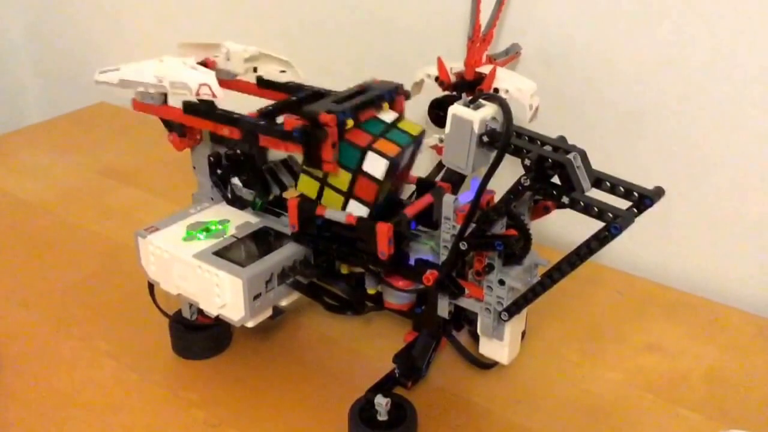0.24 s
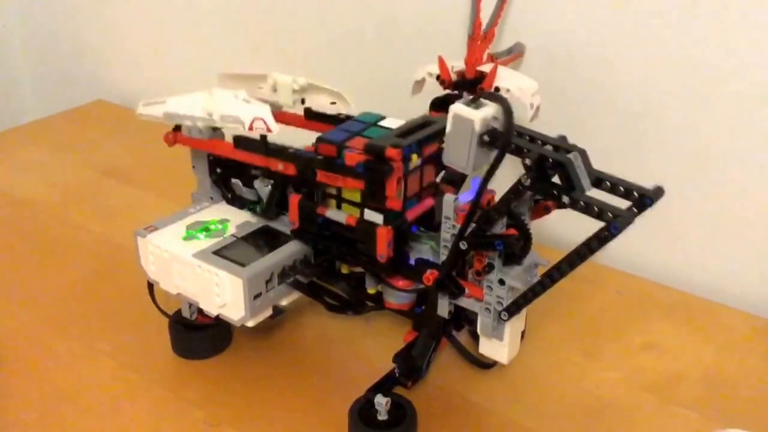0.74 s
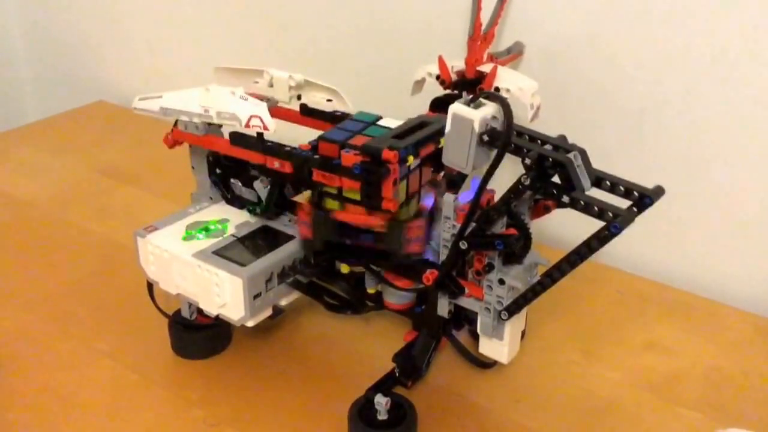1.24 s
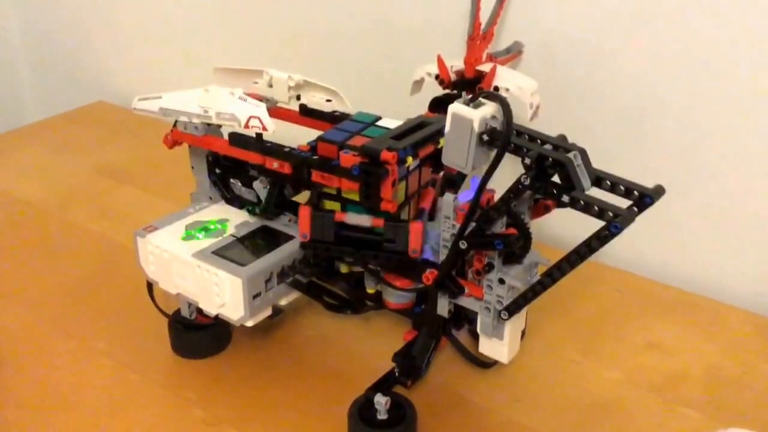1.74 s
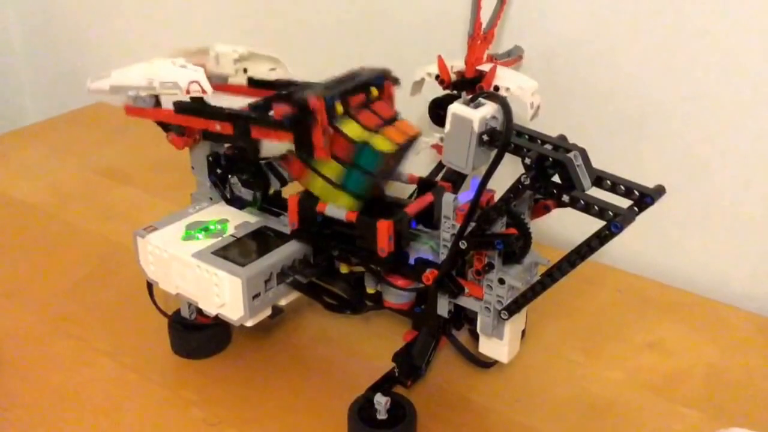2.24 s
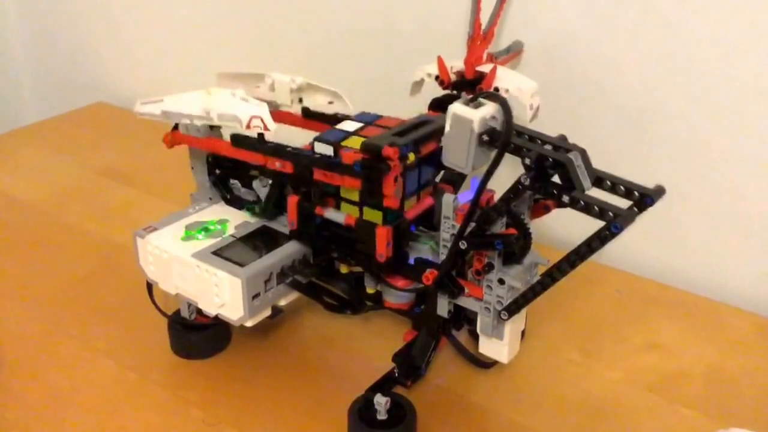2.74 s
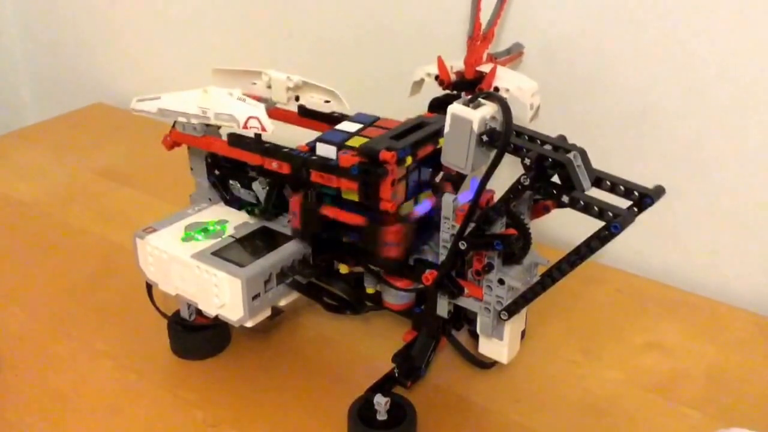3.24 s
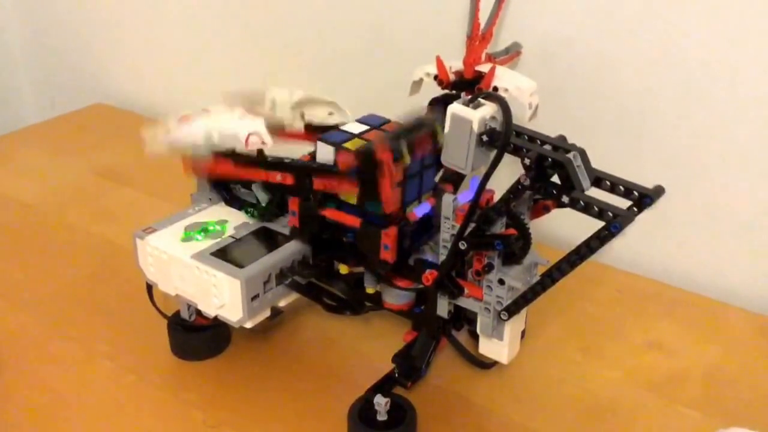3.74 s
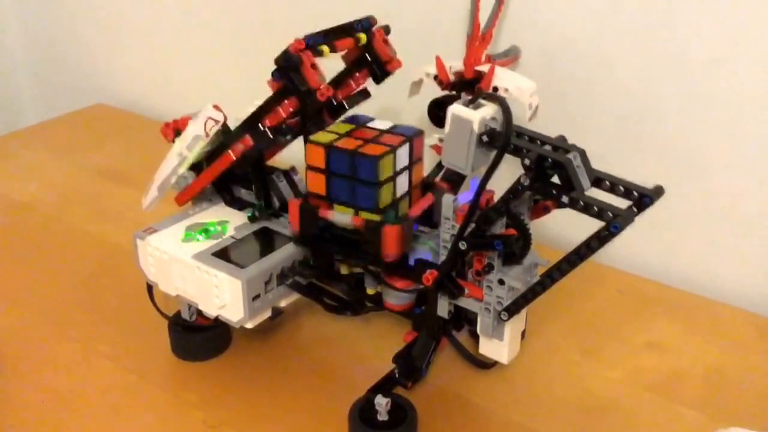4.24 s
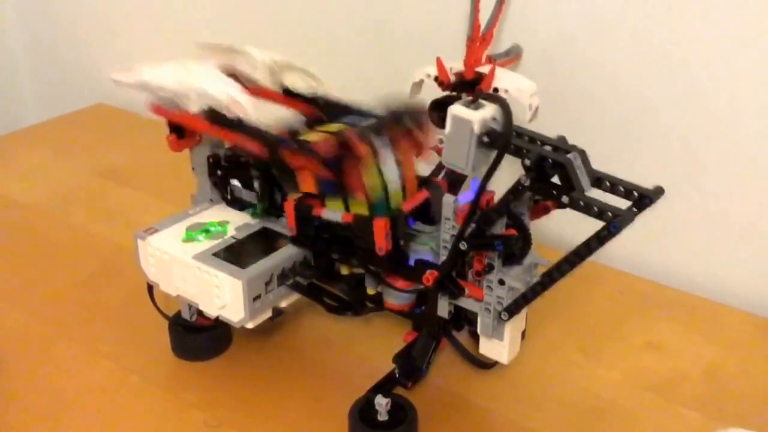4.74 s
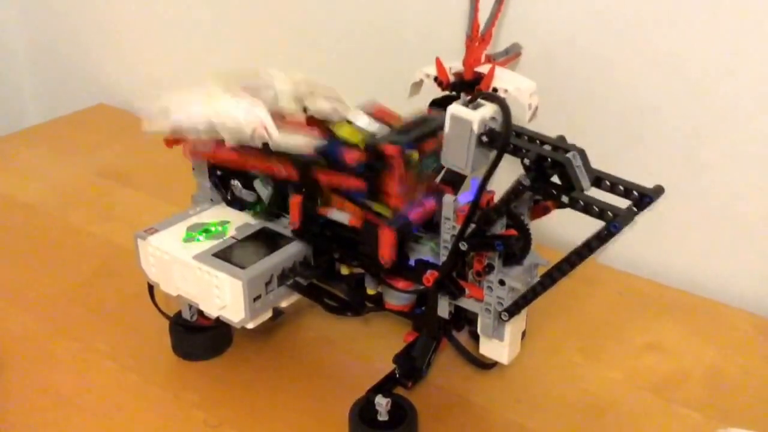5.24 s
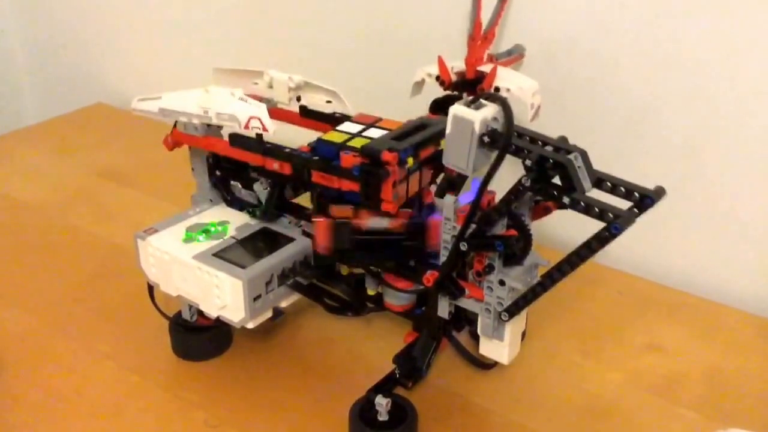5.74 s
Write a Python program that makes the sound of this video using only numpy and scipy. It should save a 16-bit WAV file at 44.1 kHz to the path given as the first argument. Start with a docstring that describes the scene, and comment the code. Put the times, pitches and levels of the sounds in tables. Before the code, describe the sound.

Toy robot turning a puzzle cube: buzzy motor whirrs, short arm swings, sharp plastic clicks and clatter in a small room.

```python
"""A geared motor spins the turntable of a toy-brick robot solving a puzzle cube, in whining runs.
Tooth contacts at fixed places excite the plastic housing, and mesh tones follow the rotor speed.
A second motor swings the arm that tips the cube over; beams click, the cube ticks as it tumbles,
blows ring the frame on a wooden table, and loose parts clatter. Decaying noise gives the
reflections of a small room, and mains hum with a faint rumble lies under it all."""
import sys
import numpy as np
from scipy import signal
from scipy.fft import rfft, irfft
from scipy.io import wavfile
from scipy.ndimage import uniform_filter1d

SR = 44100
rng = np.random.default_rng(int(sys.argv[2]) if len(sys.argv) > 2 else 0)


def dump(signal):
    """Clip the signal to [-1, 1] and save it as 16-bit WAV at the path in sys.argv[1]."""
    limited = np.clip(np.atleast_2d(signal).T, -1, 1)
    pcm = np.round(limited * 32767).astype(np.int16)
    wavfile.write(sys.argv[1], SR, pcm)


N = 264583
T = np.arange(N) / SR


def from_db(db):
    """Logarithmic level: decibels to amplitude gain."""
    return 10 ** (np.asarray(db) / 20)


def rms_one(x):
    """Normalisation: scale to rms 1."""
    return x / np.sqrt(np.mean(x ** 2) + 1e-20)


def steady(x):
    """Level equalisation: hold rms 1 over stretches of 25 ms."""
    return x / np.sqrt(np.abs(uniform_filter1d(x ** 2, size=1100)) + 1e-12)


def cut(x, hz, kind, order=4):
    """Band selection by a Butterworth filter."""
    return signal.sosfilt(signal.butter(order, hz, kind, fs=SR, output="sos"), x + 1e-18)


def colour(x, spectrum, resonances=()):
    """Minimum-phase filtering: a unit-energy response from a spectrum with resonances added."""
    size = 8192
    hz = np.maximum(np.arange(size // 2 + 1) * SR / size, 1)
    points = np.array(spectrum)
    db = np.interp(np.log(hz), np.log(points[:, 0]), points[:, 1])
    for centre, width, lift in resonances:
        db = db + lift / (1 + (2 * (hz - centre) / width) ** 2)
    # keeping only the first half of the cepstrum makes the response causal
    cepstrum = irfft(np.log(from_db(db)))[:size // 2]
    response = irfft(np.exp(rfft(2 * cepstrum, size)))
    return signal.fftconvolve(x, response / np.linalg.norm(response))[:N]


def ring(x, hz, t60):
    """Damped resonance: a unit click sets a decaying sine of initial height 1 ringing."""
    r = from_db(-60 / (t60 * SR))
    w = 2 * np.pi * hz / SR
    return signal.lfilter([0, np.sin(w)], [1, -2 * r * np.cos(w), r * r], x + 1e-18)


def drift(hz):
    """Random modulation: slow chance of rms 1, from 2 * hz knots per second."""
    knots = rng.standard_normal(int(N / SR * 2 * hz) + 2)
    return rms_one(np.interp(T * 2 * hz, np.arange(len(knots)), knots))


def clicks(times, sizes):
    """Impulse excitation: each click is shared between its two nearest samples."""
    at = np.clip(np.asarray(times) * SR, 0, N - 2)
    whole = at.astype(int)
    before = np.bincount(whole, sizes * (1 - at + whole), N)
    return before + np.bincount(whole + 1, sizes * (at - whole), N)


def taps(per_s, spread_db):
    """Random impact process: sparse clicks of either sign and uneven strength."""
    struck = rng.random(N) < per_s / SR
    return struck * rng.choice([-1, 1], N) * from_db(spread_db * rng.standard_normal(N))


def room(x, wet_db):
    """Reverberation: dense reflections from the table and near walls, dying evenly."""
    t60_s = 0.26
    age = T[:SR // 2]
    tail = rng.standard_normal(len(age)) * from_db(-60 * age / t60_s) * (age > .002)
    return x + from_db(wet_db) * signal.fftconvolve(x, tail / np.linalg.norm(tail))[:N]


# mains hum and a faint low drone: pitch_hz [Hz], level_db [dB rms]
HUM_TONES = [(99.7, -40.5), (45.5, -59.5)]
# spectrum of the room's rumble: frequency_hz [Hz], density_db [relative dB per Hz]
RUMBLE_SPECTRUM = [(20, -27), (34, -11), (45, -7), (58, -6), (80, 0.5), (120, -8.5), (200, -18.5),
                   (400, -29), (1000, -29), (4000, -35.5), (15000, -59)]


def background():
    """Stationary noise: steady hum tones over filtered noise, the faint rumble of the room."""
    hum = sum(from_db(db) * np.sqrt(2) * np.sin(2 * np.pi * hz * T) for hz, db in HUM_TONES)
    rumble_db = -53
    return hum + from_db(rumble_db) * rms_one(colour(rng.standard_normal(N), RUMBLE_SPECTRUM))


def table_boom(hz, t60, turn_lag_s, swing_lag_s, width_s, tremble_db):
    """Forced resonance: the table top booms after a turntable start or the end of an arm drive."""
    jolts = [(move[0] + turn_lag_s, move[-1]) for move in TURN_MOVES]
    jolts += [(move[0] + move[1] + swing_lag_s, move[-1]) for move in SWING_MOVES]
    power = from_db(tremble_db) ** 2
    for s, db in jolts:
        power = power + from_db(db) ** 2 / (1 + ((T - s) / width_s) ** 2) ** 2
    boom = cut(ring(rng.standard_normal(N), hz, t60), [60, 165], "band", order=3)
    return np.sqrt(power) * steady(boom)


def tumbling(landing, rolling, fall_db_per_s):
    """Envelope of one roll of the cube: it swells up to the landing, then decays exponentially."""
    rise_db = 16.5 * (np.maximum(landing - T, 0) / rolling) ** 2
    return from_db(-rise_db - fall_db_per_s * np.maximum(T - landing, 0))


# rolls of the cube in its cradle: landing_s [s], rolling_s [s], clatter_db [dB],
# ticking_db [dB before colouring]
CUBE_ROLLS = [(.52, 0.092, -48, -38), (2.12, 0.046, -52.5, -46), (2.58, 0.15, -49, -41.5),
              (3.86, 0.028, -50.5, -37), (4.494, 0.072, -45, -28.5), (4.89, 0.11, -53.5, -51),
              (5.33, 0.15, -49.5, -39.5)]
# spectrum of struck plastic: frequency_hz [Hz], density_db [relative dB per Hz]
KNOCK_SPECTRUM = [(88, -24.5), (150, -17.5), (258, -15), (948, -16), (1340, -10.5), (1510, -3),
                  (1630, -8.5), (5330, -3.5), (7710, -4), (11100, -3.5), (15500, -17.5)]


def clatter(shaking, per_s, spread_db):
    """Random impacts: loose parts jostle, shaken by the gears and by each roll of the cube."""
    power = shaking ** 2
    for s, rolling, db, _ in CUBE_ROLLS:
        power = power + (from_db(db) * tumbling(s, rolling, fall_db_per_s=133)) ** 2
    jostling = cut(colour(taps(per_s, spread_db), KNOCK_SPECTRUM), [190, 800], "band", order=3)
    return np.sqrt(power) * rms_one(jostling)


def ticking(per_s, spread_db):
    """Repeated contact: the edges of the rolling cube tick along the beams."""
    gain = sum(from_db(db) * tumbling(s, rolling, fall_db_per_s=500) for s, rolling, _, db in CUBE_ROLLS)
    return colour(gain * rms_one(taps(per_s, spread_db)), KNOCK_SPECTRUM, HOUSING_MODES)


# plastic parts and the cube striking: start_s [s], crack_db, thud_db [relative dB],
# thud_pitch_hz [Hz], snap_db [relative dB]
BLOWS = [ (.172, -22, -55, 400, -33), (.198, -20, -41, 680, -27), (.446, -29, -37, 400, -25),
         (.512, -17, -30.5, 398.5, -14.5), (.607, -24, -43, 300, -25.5), (2.086, -21, -39.5, 350, -40),
         (2.113, -34, -48, 400, -37), (2.249, -26, -56, 400, -32), (2.277, -24, -51, 400, -31),
         (2.293, -19.5, -48, 499.3, -38), (2.44, -18, -51, 399, -28), (2.534, -13, -37, 450, -19),
         (2.581, -16, -36.5, 399, -33), (2.602, -18, -34, 400, -15), (2.683, -24, -44, 300, -23.5),
         (2.713, -22, -41, 300, -25.5), (3.844, -12, -34, 500, -20), (4.04, -12, -27, 770, -12),
         (4.045, -9.5, -45, 760, -22), (4.076, -30, -37, 496.4, -14), (4.429, -7.5, -28, 350, -11),
         (4.445, -19, -38, 402, -21), (4.471, -17, -39, 400.2, -19), (4.494, -20, -35, 400.4, -15),
         (4.744, -13, -58, 400.5, -17.5), (4.878, -9, -40, 450, -13), (4.895, -16, -37.5, 504, -15.5),
         (4.964, -21.5, -44, 400, -32), (5.088, -33, -51, 399.6, -40), (5.185, -22, -60, 399.8, -24),
         (5.218, -17, -40, 399.4, -20), (5.331, -19, -36, 350, -18), (5.396, -18, -53, 399, -23)]
# modes of the frame on the table, then of single beams: pitch_hz [Hz], level_db [relative dB], t60_s [s]
FRAME_MODES = [(134, -11, 0.3), (181, -10.5, 0.13), (217, -9, .08), (278, -13.5, 0.05), (346, -8.5, 0.065),
               (419.1, -11.5, 0.072), (490, -7.5, 0.031), (592, -8, 0.074), (773, -9, 0.076),
               (853, -6.5, 0.082), (1128, 0, 0.04), (1475, -1, 0.048), (1810, 6, 0.025), (2660, -5, 0.026),
               (3340, -19, 0.021)]


def knocks(crack_db, snap_db, thud_db, chatter_s, chatter, off_pitch_db):
    """Impact and modal ringing: sharp contact, chatter between loose beams, thud of the frame."""
    crack, snap = np.zeros((2, N))
    age = T[:SR // 20]
    for s, peak, _, _, high in BLOWS:
        blow = chatter * rng.standard_normal(len(age)) * np.exp(-age / chatter_s)
        blow[0] = 1  # the sharp contact
        span = slice(int(s * SR), int(s * SR) + len(age))
        crack[span] += from_db(peak + crack_db) * blow
        snap[span] += from_db(high + snap_db) * blow
    out = cut(colour(crack, KNOCK_SPECTRUM, HOUSING_MODES), 4960, "low", order=2)
    out = out + cut(colour(snap, KNOCK_SPECTRUM, HOUSING_MODES), 8900, "high", order=2)
    s, _, low, pitch, _ = np.transpose(BLOWS)
    for k, (hz, db, t60) in enumerate(FRAME_MODES):
        # the place of the blow favours the modes near its pitch; off_pitch_db is per octave
        strength = low + thud_db + db - off_pitch_db * np.abs(np.log2(hz / pitch))
        strength = strength + 3 * rng.standard_normal(len(s))
        out = out + ring(clicks(s, from_db(strength)), hz, t60) * (-1) ** k
    return out


def drive(moves, slowest_hz, take_up_s, rattle_power, growl_power, whine_fade):
    """Run-up and braking: rotor speed, and gains of rattle, growl and whine, saturate then fall.
    The gears swell as they take up slack; the whine dies first when the motor brakes."""
    controls = np.zeros((4, N))
    for start, driven, braking, spin_up, peak_hz, rattle, growl, whine, _ in moves:
        moving = (T > start) & (T < start + driven + braking)
        age = T[moving] - start
        powered = np.minimum(age, driven)
        coast = np.clip(1 - (age - driven) / braking, 0, 1)
        speed = np.tanh(powered / spin_up) / np.tanh(driven / spin_up) * (1 - (1 - coast) ** 2)
        effort = np.tanh(powered / take_up_s) / np.tanh(driven / take_up_s) * coast
        move = [(peak_hz - slowest_hz) * speed,
                from_db(rattle) * effort ** rattle_power,
                from_db(growl) * effort ** growl_power,
                from_db(whine) * effort ** growl_power * coast ** whine_fade]
        controls[:, moving] = np.maximum(controls[:, moving], move)
    return slowest_hz + controls[0], *controls[1:]


def gear_teeth(turns, play, count=150):
    """Backlash: contacts keep their places every turn, but their strengths vary strongly between turns."""
    place, strength = rng.random(count), rng.standard_normal(count)
    when = np.arange(int(turns[-1]) + 1)[:, None] + place
    sizes = strength + play * rng.standard_normal(when.shape)
    within = when < turns[-1]
    return clicks(np.interp(when[within], turns, T), sizes[within])


# resonances of the plastic housings: centre_hz [Hz], width_hz [Hz], lift_db [dB when struck]
HOUSING_MODES = [(1135, 33, 1.5), (1282, 140, 3.5), (2224, 37, 2), (2546, 320, 3.5), (3760, 160, 3.5),
                 (4176, 60, 7), (4840, 43, 6), (5340, 150, 2), (6910, 150, 3.5), (7700, 154, -1),
                 (8600, 116, 1.5), (8740, 140, 5.5), (9200, 350, -0.5), (10450, 66, 8), (11530, 900, 4.5)]


def mesh_tones(turns, rate, whine, load_roughness, shake_hz, resonance):
    """Gear-mesh harmonics: rough while speeding up, cleaner at full speed, changed by resonances."""
    acceleration = uniform_filter1d(np.gradient(rate) * SR, size=1300)
    load = np.clip(acceleration / 200, 0, 1)
    loss_db_per_octave = 2.5
    out = 0
    for order, db, rough in whine:
        order = np.round(order)
        share = np.clip(rough + load_roughness * load, 0, 1)
        smear_hz = shake_hz * order / 20   # higher tones smear wider
        smear = drift(smear_hz) + 1j * drift(smear_hz)
        height = np.sqrt(1 - share) + np.sqrt(share / 2) * smear
        tone_hz = order * rate[::64]
        lift = sum(peak / (1 + (2 * (tone_hz - hz) / width) ** 2) for hz, width, peak in HOUSING_MODES)
        tone = np.real(height * np.exp(2j * np.pi * (order * turns + rng.random())))
        # under load the main 20-tooth mesh holds while the tones far from it weaken
        tone = tone * from_db(-loss_db_per_octave * load * np.abs(np.log2(order / 20)))
        out = out + tone * from_db(db + resonance * np.interp(T, T[::64], lift))
    return out


def motor(controls, spectrum, whine, play, wobble, flutter_db, rattle_throb_db, growl_throb_db,
          load_roughness, shake_hz):
    """Source and resonator: tooth clicks ring in the housing, and mesh tones ride on them."""
    rate, rattle, growl, singing = controls
    turns = np.cumsum(rate * (1 + wobble * drift(35))) / SR
    teeth = colour(gear_teeth(turns, play), spectrum, HOUSING_MODES)
    # an off-centre gear further down the train makes the rattle throb
    throb = np.sin(2 * np.pi * .28 * turns)
    high = rattle * from_db(rattle_throb_db * throb) * steady(cut(teeth, 5430, "high"))
    low = growl * from_db(growl_throb_db * throb) * steady(cut(teeth, 4600, "low"))
    gears = (high + low) * from_db(flutter_db * drift(60))
    tones = singing * mesh_tones(turns, rate, whine, load_roughness, shake_hz, resonance=0.99)
    # the small housing radiates little below a kilohertz
    return cut(np.array([gears, tones]), 1021, "high", order=14)


# arm strokes and short settling nudges: start_s, driven_s, braking_s, spin_up_s [s],
# peak_speed_hz [rotor turns per s], rattle_db, growl_db, whine_db, table_boom_db [dB]
SWING_MOVES = [ (-.103, 0.12, 0.2, 0.096, 77.4, -37, -38, -39, -47.5),
               (.113, 0.077, 0.11, .1, 66.1, -43, -42, -44, -41),
               (.31, .2, 0.13, .12, 93.8, -33, -37, -38, -42.5),
               (.568, .029, 0.13, .1, 60.7, -48, -41.5, -46, -48),
               (1.95, 0.16, 0.2, .1, 82.76, -37, -36, -36.5, -42.5),
               (2.191, 0.11, 0.11, .1, 56.9, -46, -45.5, -53, -48),
               (2.387, 0.21, 0.085, .14, 98.9, -35, -37.5, -43, -43.5),
               (2.639, 0.049, 0.14, 0.081, 62.9, -49, -42.5, -49, -40.5),
               (3.692, 0.14, 0.15, .055, 83.3, -33.5, -37, -32, -40),
               (4.343, .157, .156, 0.096, 75.9, -40, -39, -40.5, -36.5),
               (4.657, 0.13, 0.33, .11, 80.86, -36.5, -38.5, -34.5, -42.5),
               (4.845, 0.13, 0.085, .1, 63, -43.5, -40.5, -43, -43),
               (5.102, 0.14, .25, .08, 92, -33, -36.5, -36.5, -39.5),
               (5.378, .018, 0.1, 0.097, 64.2, -39.5, -40, -43, -50.5)]
# mesh tones: order [multiple of rotor speed, rounded when played], level_db [relative dB], roughness [0-1]
ARM_TONES = [(20, -7.5, 0.37), (23, -14.5, 0.55), (27, -18, 0.73), (40, -7, .4), (45, -9.5, .35),
             (50, -7.5, 0.36), (59, -10.5, 0.54)]
# spectrum of the gears: frequency_hz [Hz], density_db [relative dB per Hz]
ARM_SPECTRUM = [(410, -52), (700, -8), (955, -11), (1250, -5.5), (1470, -6), (2130, -2.5), (2870, -10.5),
                (3730, -5), (3970, -8), (4890, -3), (6260, -5), (11500, 4.5), (15500, -12)]


def arm_motor():
    """Gear-mesh excitation in short swings: gear noise and whine of the arm, and its growl gain."""
    controls = drive(SWING_MOVES, slowest_hz=43.85, take_up_s=0.07, rattle_power=2.47, growl_power=1.55,
                     whine_fade=4.6)
    gears, whine = motor(controls, ARM_SPECTRUM, ARM_TONES, play=1.9, wobble=0.005, flutter_db=1.73,
                         rattle_throb_db=0.9, growl_throb_db=0.45, load_roughness=0.53, shake_hz=24)
    return gears, whine, controls[2]


# turntable runs: start_s, driven_s, braking_s, spin_up_s [s], peak_speed_hz [rotor turns per s],
# rattle_db, growl_db, whine_db, table_boom_db [dB]
TURN_MOVES = [ (.781, .778, .11, .21, 113.4, -26.9, -35.8, -34, -45),
              (1.745, .11, .1, .12, 71, -35.1, -40.5, -49, -55),
              (2.863, .43, .115, .185, 113.1, -26.7, -35.5, -34.5, -47),
              (3.477, .11, .098, .12, 69, -34.7, -41.2, -50, -50),
              (3.905, .334, .125, .18, 117, -32, -38.8, -44, -42),
              (5.565, .42, .1, .18, 112.8, -26.5, -35.6, -34.5, -47)]
# mesh tones: order [multiple of rotor speed, rounded when played], level_db [relative dB], roughness [0-1]
TURNTABLE_TONES = [(10, -4.8, .13), (20, -3.5, .13), (22, -10.5, 0.55), (31, -9, 1), (33, -12.5, .5),
                   (40, -12, 0.7), (43, -11, 0.6), (46, -7.5, 0.22), (49, -11, .6), (60, -8, .25),
                   (61, -4, .25), (74, -8.5, .4), (77.4, -5.5, 0.3), (90, -15, 0.41), (91, -10.5, .4)]
# spectrum of the gears: frequency_hz [Hz], density_db [relative dB per Hz]
TURNTABLE_SPECTRUM = [(410, -88), (700, -15), (955, -7.5), (1100, -8.5), (1190, -8.5), (1920, -14),
                      (2190, -4.5), (2870, -11), (3770, -6), (4520, -12.5), (5220, -6.5), (5860, -7),
                      (10400, 2), (14500, -11), (15500, -19)]


def turntable_motor():
    """Gear-mesh excitation in runs: gear noise and whine of the turntable, and its growl gain."""
    controls = drive(TURN_MOVES, slowest_hz=44.1, take_up_s=0.087, rattle_power=1.48, growl_power=0.81,
                     whine_fade=2.6)
    gears, whine = motor(controls, TURNTABLE_SPECTRUM, TURNTABLE_TONES, play=2.1, wobble=0.00071,
                         flutter_db=0.8, rattle_throb_db=0.6, growl_throb_db=1.5, load_roughness=0.75,
                         shake_hz=33)
    return gears, whine, controls[2]


def scene():
    """Superposition: both motors and the knocks in the room, heard by one microphone."""
    table_gears, table_whine, table_growl = turntable_motor()
    arm_gears, arm_whine, arm_growl = arm_motor()
    blows = knocks(crack_db=4.0, snap_db=10.0, thud_db=2.5, chatter_s=0.004, chatter=0.21, off_pitch_db=7.0)
    blows = blows + ticking(per_s=500, spread_db=3)
    shaking = from_db(-23.5) * table_growl + from_db(-17.5) * arm_growl
    loose = clatter(shaking, per_s=450, spread_db=1.5)
    boom = table_boom(hz=134.5, t60=0.42, turn_lag_s=0.16, swing_lag_s=0.049, width_s=0.067, tremble_db=-61)
    turntable = room(table_gears, wet_db=-5) + room(table_whine, wet_db=-8)
    arm = room(arm_gears + arm_whine, wet_db=-9.5)
    mono = turntable + arm + room(blows, wet_db=-1.5) + loose + boom + background()
    return np.array([mono, mono])


def record(dry):
    """Band limitation: a steep zero-phase elliptic filter removes the top above 15.6 kHz."""
    return signal.sosfiltfilt(signal.ellip(10, .05, 70, 15600, fs=SR, output="sos"), dry)


dry = scene()
out = record(dry)
dump(out)
```